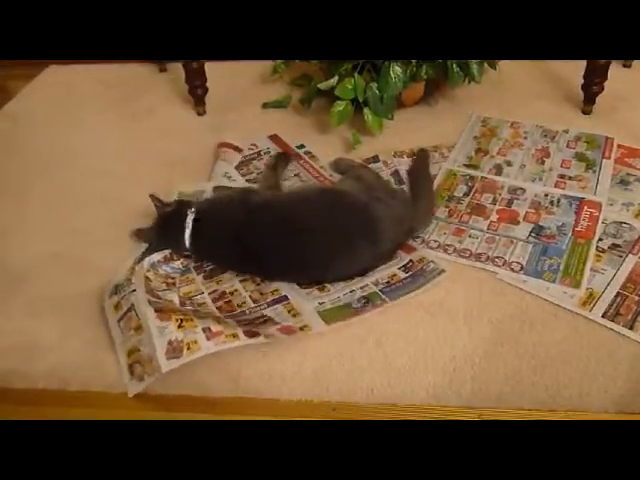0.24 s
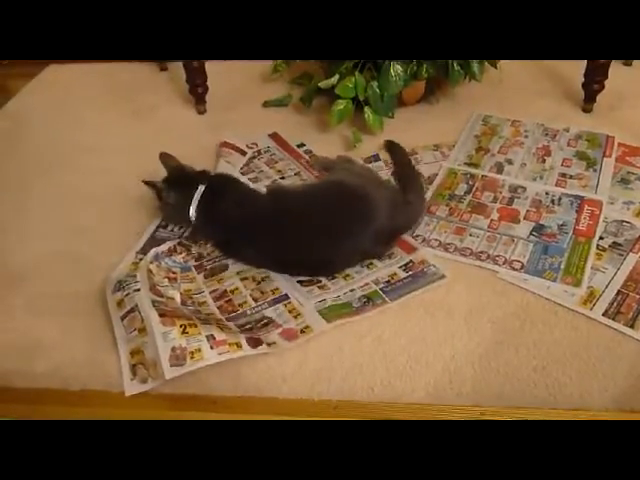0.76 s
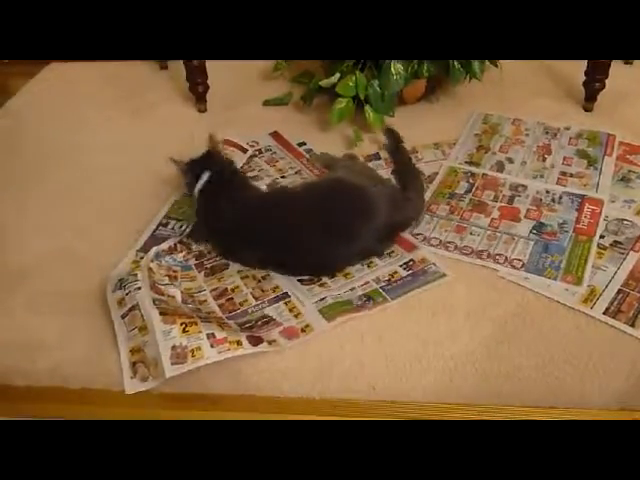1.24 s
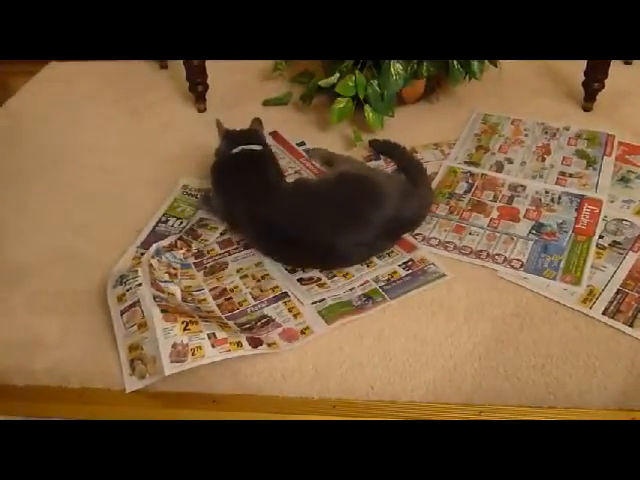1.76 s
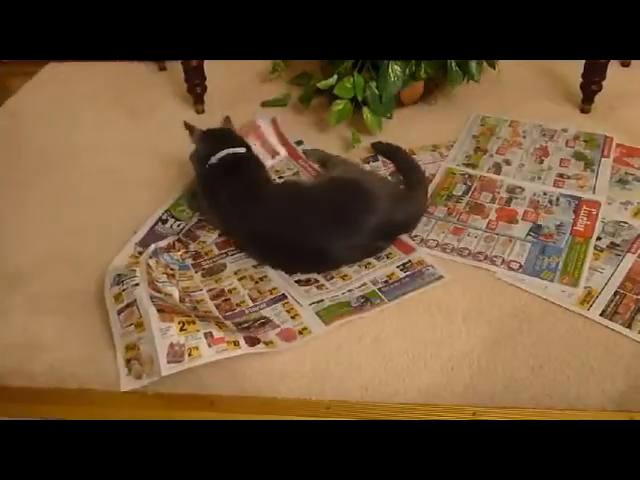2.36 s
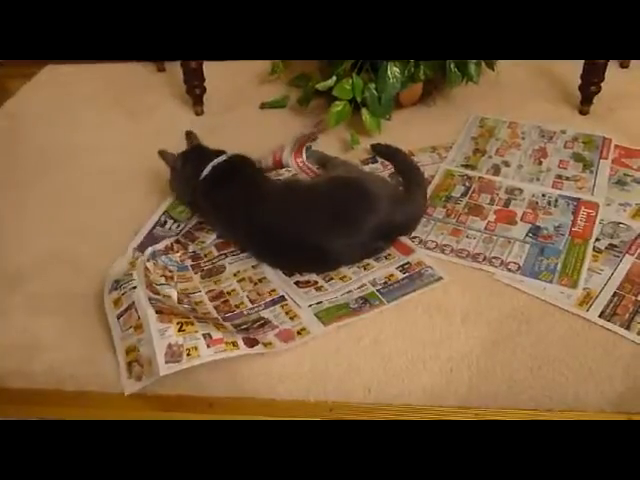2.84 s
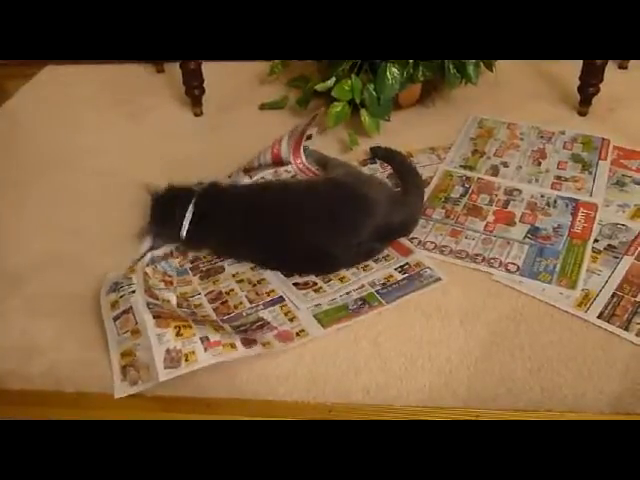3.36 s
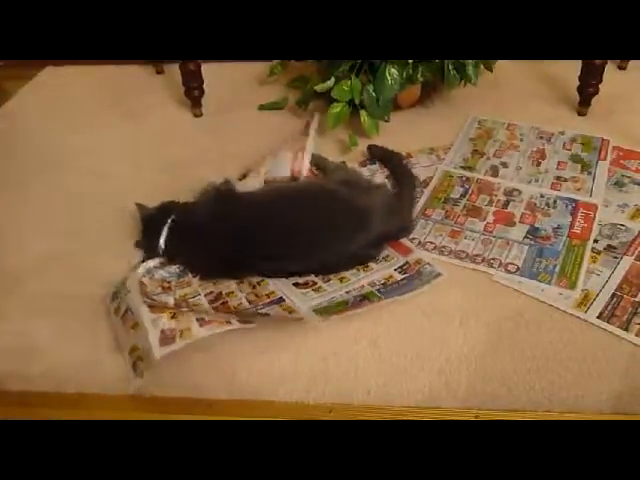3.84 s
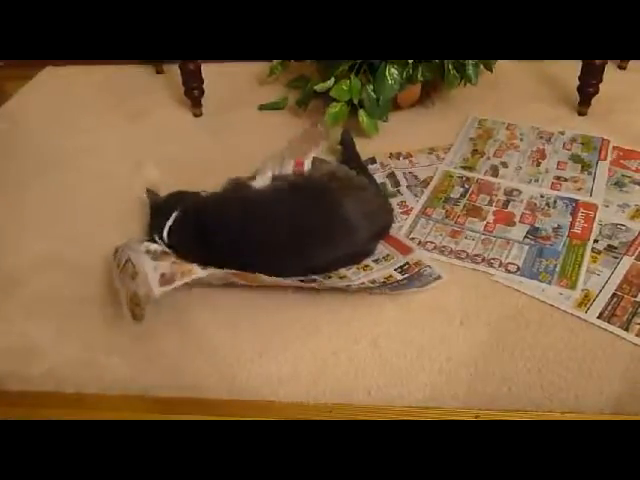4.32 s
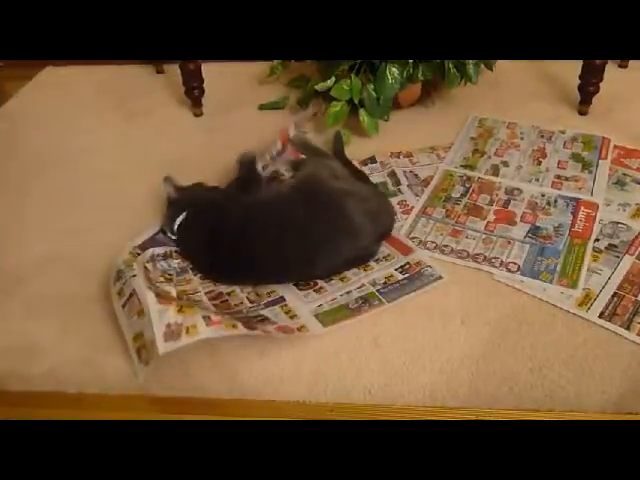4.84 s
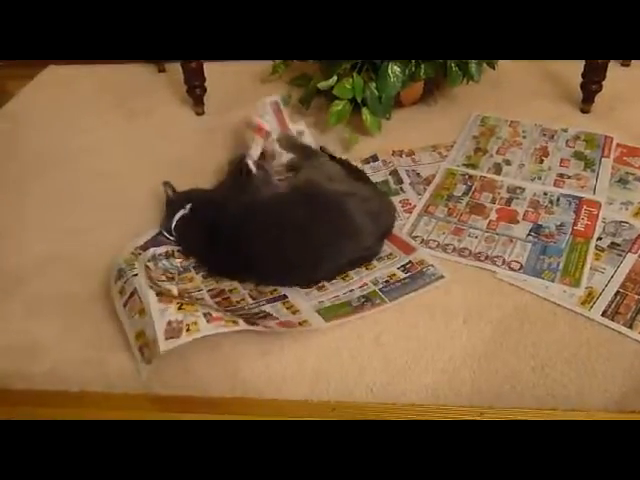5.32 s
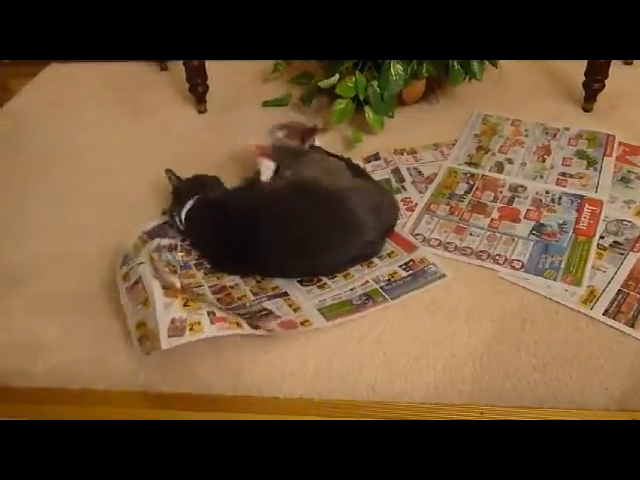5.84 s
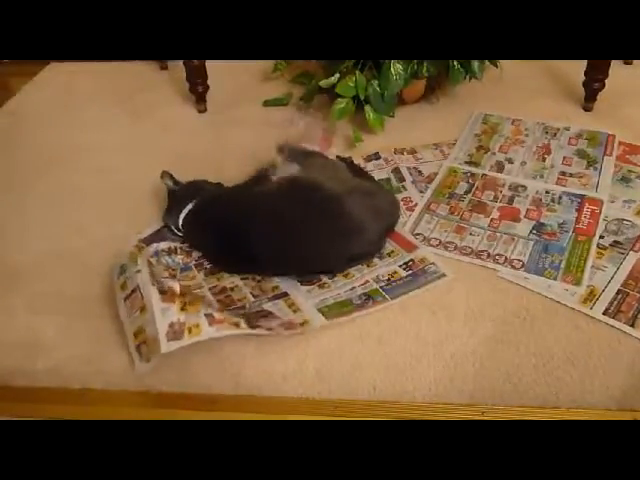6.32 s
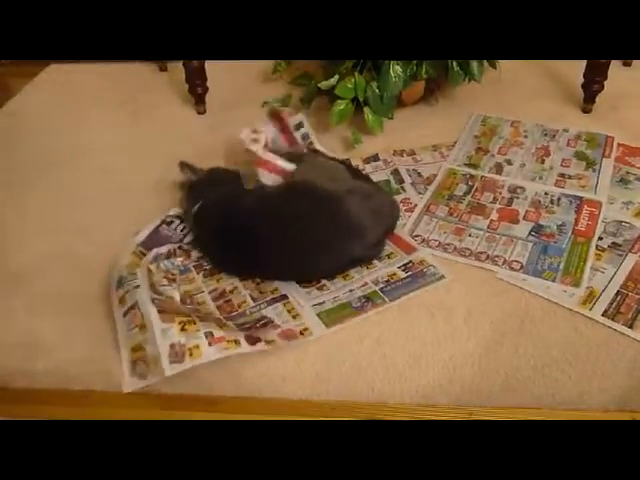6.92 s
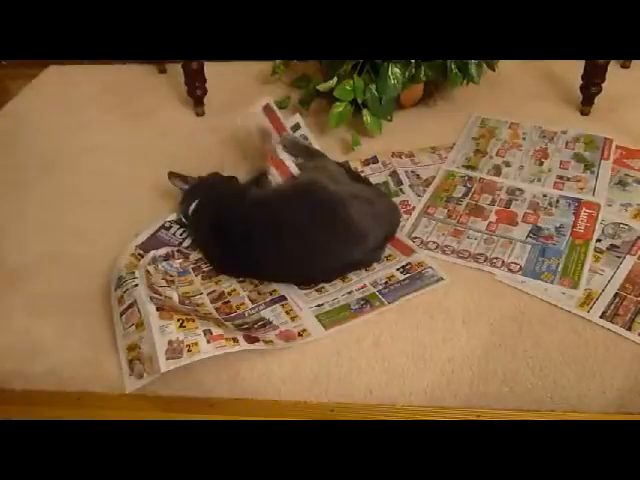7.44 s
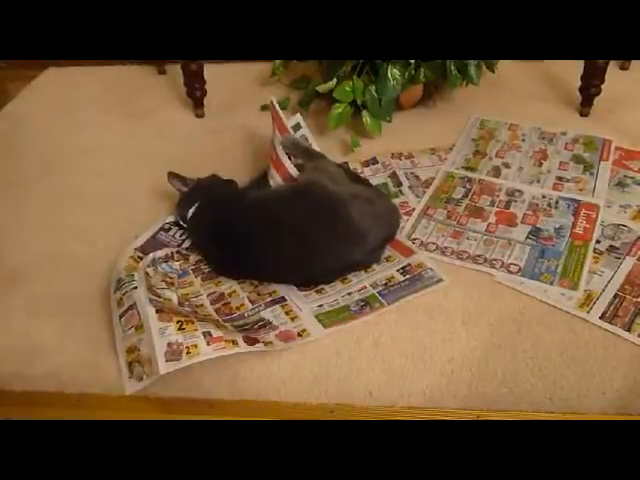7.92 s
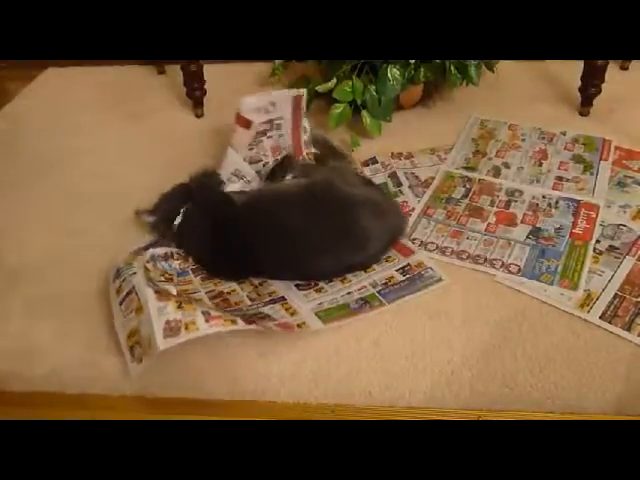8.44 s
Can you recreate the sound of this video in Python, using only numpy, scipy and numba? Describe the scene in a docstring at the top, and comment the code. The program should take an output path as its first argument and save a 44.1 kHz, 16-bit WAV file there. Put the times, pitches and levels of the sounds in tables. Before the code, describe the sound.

Newsprint crackles, snaps and flaps in irregular bursts as a cat squirms on it in a carpeted room, with a faint collar-tag tinkle.

```python
"""Furnished, carpeted room: a cat rolls and kicks on sheets of newsprint before a small camera.
Creases buckle in dense swarms and loud single snaps, and sheets flap: all short decaying sines.
A collar tag tinkles (decaying modes) and something squeaks faintly (wavering sines).
Echoes and a reverberant tail surround these; a soft room tone of filtered noise and a hum lies beneath."""
import sys
import numpy as np
from scipy import signal
from scipy.fft import rfft, irfft
from scipy.io import wavfile
from scipy.ndimage import uniform_filter1d
from numba import njit

SR = 44100
rng = np.random.default_rng(int(sys.argv[2]) if len(sys.argv) > 2 else 0)


def store_pcm(level_fs):
    """Save levels as 16-bit WAV."""
    pcm = np.round(np.clip(level_fs, -1, 1) * 32767).astype(np.int16)
    wavfile.write(sys.argv[1], SR, np.atleast_2d(pcm).T)


def natural_amplitude(level_db):
    """Convert a level in decibels to a linear amplitude factor, elementwise."""
    exponent = np.asarray(level_db, float) / 20
    return 10 ** exponent


N = 382788
TIME_S = np.arange(N) / SR

# Room tone spectral density: (frequency [Hz], relative density [dB])
ROOM_TONE_DENSITY = [(25, 17.5), (60, -1), (170, 4), (300, -6), (420, -7), (600, -11.5), (900, -10),
                     (1500, -12), (3000, -20), (6000, -28.5), (8500, -33.5)]
# Kicks, rolls and shuffles of the cat: (start [s], length [s], crinkle drive [dB],
# flap of whole sheets re crinkle [dB], fine crackle re crinkle [dB])
MOVES = [(0.04, 0.068, -52, -9, -25), (0.177, 0.13, -49, -4, -19), (0.316, 0.21, -51.5, -4.5, -7.5),
         (1.439, 0.014, -51, 4.5, -11), (1.566, 0.018, -43.5, -4.5, -5), (1.894, 0.049, -42.5, -1.5, -17),
         (2.11, 0.02, -42, -11, -10), (2.283, 0.036, -44, -9, -5), (2.375, 0.23, -45.5, -4.5, -7),
         (2.792, 0.015, -54.5, 8, -12), (2.9, 0.062, -57, 3, -14), (3.212, 0.1, -55, 4, -5),
         (3.406, 0.069, -41, -5.5, -3.5), (3.55, 0.057, -49.5, -5, -14), (3.658, 0.07, -50.5, -6, -19),
         (3.776, 0.067, -40.5, -8, -6.5), (3.889, 0.055, -37, -15, -8), (3.987, 0.12, -41.5, -5, -7.5),
         (4.195, 0.071, -45, 1, -8), (4.317, 0.18, -40.5, -4, -8.5), (4.597, 0.11, -45.5, -4.5, -6),
         (4.782, 0.063, -47, -5.5, -4.5), (4.898, 0.048, -35.5, -4, -6), (5.043, 0.046, -45, -13, -4),
         (5.15, 0.031, -40, -2, -1), (5.317, 0.058, -34, -4, -3), (5.421, 0.064, -37, -6, -6),
         (5.624, 0.1, -44, -7.5, -3.5), (5.795, 0.12, -42.5, -5.5, -3), (5.963, 0.062, -32.5, -4, -3),
         (6.075, 0.17, -40.5, -5, -9.5), (6.363, 0.043, -35.5, 1, -7.5), (6.478, 0.11, -33, -5, -4.5),
         (6.658, 0.057, -41.5, -0.5, -2), (6.702, 0.037, -49.5, -4, -3), (6.812, 0.13, -37.5, -6.5, -4.5),
         (6.996, 0.08, -47.5, -1.5, -10), (7.113, 0.082, -41, -4.5, -10.5),
         (7.227, 0.075, -40.5, -2, -12.5), (7.374, 0.1, -54, -3, -12), (7.51, 0.071, -52, 2.5, -8),
         (8.203, 0.1, -51, -0.5, -10), (8.36, 0.05, -53, 4, -14), (8.417, 0.12, -48, -6, -21),
         (8.56, 0.079, -56.5, -3, -5)]
# Drive from the cat's weight between moves: crinkle [dB], flap [dB], fine crackle [dB]
REST_DRIVE_DB = [-70, -63, -81]
# Ring level of paper patches by pitch: (frequency [Hz], relative level [dB])
PAPER_SPECTRUM = [(59, -43), (100, -30.5), (288, 0.5), (380, -8), (511, -4), (663, -3.5), (2020, 8.5),
                  (5690, -3.5), (8400, -51.5), (10900, -62), (18500, -120)]
# Loudest single creases giving way: (time [s], relative level [dB], patch pitch [Hz],
# crack sharpness [dB], crackle set off re snap [dB])
SNAPS = [(0.1186, -35, 1950, -25, -16.5), (0.2174, -29.5, 2100, -30.5, -16),
         (0.3365, -40, 1540, -9.5, -18.5), (0.4968, -34, 1510, -14, -14.5),
         (0.6988, -32.5, 1940, -21.5, -13.5), (1.3681, -32, 1080, -19, -18),
         (1.4364, -32, 1990, -7.5, -18.5), (1.5588, -35.5, 1440, -8.5, -18), (1.8868, -28, 1490, -30, -20),
         (1.9706, -27, 1510, -10.5, -17), (2.097, -33.5, 1960, -29, -16), (2.362, -28, 1890, -24, -20.5),
         (2.4358, -24.5, 1210, -14.5, -16.5), (2.4945, -35, 3800, -1, -18),
         (2.5643, -29.5, 930, -4.5, -18.5), (3.2415, -38, 2070, -11, -18), (3.372, -25.5, 1580, -13, -17.5),
         (3.468, -33, 1660, -4, -22.5), (3.5543, -36, 1940, -24, -20.5), (3.697, -30.5, 1560, -15, -19),
         (3.7515, -16, 2030, -7.5, -20.5), (3.8442, -22.5, 1180, -5.5, -21),
         (3.9158, -20.5, 1110, -19, -20), (4.068, -30, 1540, -8.5, -14.5), (4.1909, -29, 1010, -15, -22),
         (4.25, -29.5, 1990, -11, -17), (4.3818, -33, 2180, -6.5, -18), (4.406, -24.5, 2010, -20.5, -22),
         (4.6209, -29, 920, -20, -13.5), (4.7706, -36.5, 2870, -2, -21), (4.8289, -22.5, 3380, -13, -19),
         (4.8913, -31, 2050, -6.5, -18.5), (5.0487, -30.5, 1730, -1.5, -20),
         (5.1496, -21.5, 1070, -14.5, -19), (5.286, -34.5, 1480, -15, -19),
         (5.3204, -27.5, 1530, -9.5, -18), (5.369, -18.5, 1580, -6.5, -20), (5.456, -27, 2040, -14, -17.5),
         (5.6272, -29, 2340, -13, -19), (5.7389, -21.5, 3420, -13, -21), (5.8053, -29, 2070, -13, -23),
         (5.9565, -31, 1110, -15, -19.5), (5.9859, -12.5, 2660, -15, -19), (6.0676, -21, 2010, -17, -22.5),
         (6.0879, -25.5, 1090, -10, -19), (6.1544, -26.5, 2020, -17.5, -18), (6.332, -34.5, 2660, -11, -15),
         (6.359, -20, 1500, -19, -30), (6.3802, -22, 2160, -14, -20), (6.469, -27.5, 2060, -16, -24),
         (6.492, -22, 1470, -7, -26.5), (6.5333, -19, 1066, -11.5, -21.5), (6.6472, -20, 1970, -8, -16.5),
         (6.8015, -28.5, 1950, -2, -21), (6.9127, -21.5, 1150, -21.5, -24.5),
         (7.1023, -28.5, 1880, -14.5, -19.5), (7.2157, -22.5, 1600, -13.5, -24),
         (7.273, -27, 1660, -4, -20.5), (7.5032, -24.5, 1090, -14.5, -23.5),
         (7.5972, -36, 1100, -13.5, -20.5), (8.2666, -30, 2020, -21, -18), (8.3534, -30, 969, -12.5, -14.5),
         (8.422, -35, 1110, -12, -19), (8.4442, -25, 3380, -16.5, -19.5), (8.4795, -22, 1130, -18, -19.5)]
# Collar tag strikes: (time [s], level [dB])
TAG_HITS = [(0.641, -41.5), (8.572, -39), (8.6567, -52.5)]
# Collar tag modes: (frequency [Hz], level re strike [dB], T60 [s])
TAG_MODES = [(6050, -18, .16), (6015, -20, .12), (5930, -14, .04), (6950, -19, .03)]
# Faint squeaks: (start [s], length [s], pitch [Hz], mean level [dB])
SQUEAKS = [(.81, .085, 3450, -70), (7.978, .028, 2430, -60.5)]
# Floor, furniture, wall: (nominal delay [s], level re direct [dB])
ECHOES = [(.004, -7.5), (.0095, -12.5), (0.0142, -15.5)]
# Reverberation time: (frequency [Hz], T60 [s])
ROOM_T60 = [(200, 0.68), (1000, 0.62), (6000, 0.29)]
# Resonances of floor, room and camera body: (centre [Hz], width [Hz], lift [dB])
RESONANCES = [(228, 22, 2), (325, 120, 5), (583, 180, 6), (1010, 270, 3), (1530, 250, 3), (2050, 200, 2.5),
              (3640, 850, 3.5), (5810, 880, 3.5)]


def on_log(table, hz):
    """Read a (Hz, value) table, linear in log frequency."""
    table_hz, value = np.transpose(table)
    return np.interp(np.log(np.maximum(hz, 1)), np.log(table_hz), value)


def level(x, rms_db):
    """Scale to an rms level."""
    return x * natural_amplitude(rms_db) / np.sqrt(np.mean(x ** 2))


def walk(per_s):
    """Smooth random curve, per_s fresh values a second, spread near 1."""
    hold = SR // per_s
    steps = np.repeat(rng.standard_normal(N // hold + 1), hold)
    smooth = uniform_filter1d(uniform_filter1d(steps, hold), hold)
    return 1.3 * smooth[:N]


def band(x, lo_hz, hi_hz):
    """Band-pass."""
    return signal.sosfilt(signal.butter(2, [lo_hz, hi_hz], "bandpass", fs=SR, output="sos"), x)


@njit
def rings(start_s, hz, t60_s, size, n, sr):
    """Sum of exponentially dying sines, each cut at its T60."""
    out = np.zeros(n)
    for k in range(len(start_s)):
        phasor = size[k] + 0j
        turn = np.exp(2j * np.pi * hz[k] / sr - np.log(1000) / (t60_s[k] * sr))
        first = int(start_s[k] * sr)
        for j in range(first, min(n, first + int(t60_s[k] * sr))):
            out[j] += phasor.imag
            phasor *= turn
    return out


def room_tone():
    """Air and appliance murmur: half-octave noise bands that flicker a little, plus one faint hum."""
    murmur = 0
    for hz in 25 * 2 ** np.arange(0, 8.5, .5):
        noise = band(rng.standard_normal(N), hz / 2 ** .25, hz * 2 ** .25)
        murmur = murmur + natural_amplitude(on_log(ROOM_TONE_DENSITY, hz) + 1.1 * walk(per_s=6)) * noise
    hum = np.sin(2 * np.pi * 480 * TIME_S)
    return level(murmur, rms_db=-50.5) + level(hum, rms_db=-69)


def moves():
    """Drive of crinkle, flap and fine crackle: each move rises, holds, falls fast, then settles slowly."""
    attack_db_per_s, release_db_per_s = 448, 158
    settle_db, settle_db_per_s = -24.5, 49  # paper goes on unfolding
    coarse_s = TIME_S[::64]
    power = natural_amplitude(2 * np.array(REST_DRIVE_DB))[:, None] + 0 * coarse_s
    for start_s, length_s, crinkle_db, flap_db, crisp_db in MOVES:
        early_s = np.maximum(start_s - coarse_s, 0)
        late_s = np.maximum(coarse_s - start_s - length_s, 0)
        rise = natural_amplitude(-2 * attack_db_per_s * early_s)  # factor 2: dB of power
        fall = natural_amplitude(-2 * release_db_per_s * late_s)
        settle = natural_amplitude(2 * (settle_db - settle_db_per_s * late_s))
        peak = natural_amplitude(2 * (crinkle_db + np.array([0, flap_db, crisp_db])))
        power = power + np.outer(peak, (fall + settle) * rise)
    return [np.interp(TIME_S, coarse_s, np.sqrt(p)) for p in power]


def swarm(per_s, lo_hz, hi_hz, cycles, spread_db):
    """Paper patches of many sizes buckle up or down at random; most are faint, a few stand out."""
    where, patch, luck, side = rng.random((per_s * N // SR, 4)).T
    hz = lo_hz * (hi_hz / lo_hz) ** patch
    stand_out = np.minimum(-np.log(1 - luck), 4.5)
    size = np.sign(side - .5) * hz * natural_amplitude(on_log(PAPER_SPECTRUM, hz) + spread_db * stand_out)
    return level(rings(where * N / SR, hz, cycles / hz, size, N, SR), rms_db=0)


def crinkle():
    """Three sizes of patch follow the cat's motion in quick avalanches; sparse ticks follow it too."""
    mid_move, flap_move, crisp_move = moves()
    _, snap_db, _, sharp_db, after_db = np.transpose(SNAPS)
    avalanche = np.clip(walk(per_s=40), -2, 2)

    flap_drive = flap_move * natural_amplitude(-5.0 + 0.89 * avalanche)
    mid_drive = mid_move * natural_amplitude(-5.0 + 1.46 * avalanche)
    mid_drive = mid_drive + aftermath(snap_db + after_db)
    crisp_drive = crisp_move * natural_amplitude(-5.5 + 0.85 * avalanche + 1.7 * walk(per_s=60))
    crisp_drive = crisp_drive + aftermath(snap_db + after_db + sharp_db + 13)

    ticks = natural_amplitude(-14.5) * mid_move * swarm(per_s=90, lo_hz=2460, hi_hz=6950, cycles=3.0, spread_db=3.0)
    flap = flap_drive * swarm(per_s=1500, lo_hz=114, hi_hz=796, cycles=5.0, spread_db=2.5)
    mid = mid_drive * swarm(per_s=2500, lo_hz=860, hi_hz=3810, cycles=5.25, spread_db=3.0)
    crisp = crisp_drive * swarm(per_s=1800, lo_hz=3570, hi_hz=8600, cycles=4.5, spread_db=1.0)
    return flap + mid + crisp + ticks


def aftermath(db):
    """Each snap loosens its neighbours: activity starts at once and dies away."""
    t60_s = 0.097
    kicks = np.zeros(N)
    np.add.at(kicks, (np.transpose(SNAPS)[0] * SR).astype(int), natural_amplitude(db))
    return signal.lfilter([1], [1, -1000 ** (-1 / (t60_s * SR))], kicks)


def snaps():
    """Each snap rings its patch; seven short cracks, low to high in pitch, scatter over 2.2 ms."""
    start_s, db, hz, sharp_db, _ = np.transpose(SNAPS)
    out = rings(start_s + 0.000965, hz, 45.0 / hz, natural_amplitude(db - 13.5), N, SR)
    for pitch in np.linspace(0, 1, 7):
        late, detune, side = rng.random((len(start_s), 3)).T
        crack_hz = 1100 * 6.8 ** pitch * (0.72 + 0.62 * detune)
        # sharpness acts on the higher cracks
        crack_db = db - 17.5 + (sharp_db + 14) * np.clip(2 * pitch - .5, 0, 1)
        size = np.sign(side - .5) * natural_amplitude(crack_db)
        out += rings(start_s + .0022 * late, crack_hz, 16.0 / crack_hz, size, N, SR)
    return out


def tag():
    """Small metal collar tag: each strike rings every mode."""
    start_s, db = np.transpose(TAG_HITS)
    out = 0
    for hz, mode_db, t60_s in TAG_MODES:
        out = out + rings(start_s, hz + 0 * start_s, t60_s + 0 * start_s, natural_amplitude(db + mode_db), N, SR)
    return out


def squeaks():
    """Soft, slightly rough tones of wavering pitch that swell and fade."""
    out = 0
    for start_s, length_s, hz, db in SQUEAKS:
        swell = np.sin(np.pi * np.clip((TIME_S - start_s) / length_s, 0, 1))
        waver_s = np.cumsum(.006 * walk(per_s=30)) / SR
        tone = np.sin(2 * np.pi * hz * (TIME_S + waver_s))
        out = out + natural_amplitude(db + 2 * walk(per_s=150)) * swell * tone
    return out


def room(x):
    """Direct sound, three near echoes, and a tail that fills in, then dies sooner in the treble.
    Every call is another spot on the floor, with its own echo pattern."""
    t_s = TIME_S[:SR // 2]
    tail = 0
    for hz in 125 * 2 ** np.arange(7):
        noise = band(rng.standard_normal(len(t_s)), hz / 2 ** .5, hz * 2 ** .5)
        tail = tail + noise * 1000 ** (-t_s / on_log(ROOM_T60, hz))
    tail = tail * np.clip(t_s / 0.017, 0, 1)
    response = natural_amplitude(-7) * tail / np.sqrt(np.sum(tail ** 2))  # tail energy re direct
    response[0] += 1
    for delay_s, db in ECHOES:
        response[int(delay_s * rng.uniform(.9, 1.1) * SR)] += natural_amplitude(db)
    return signal.fftconvolve(x, response)[:N]


def scene():
    """The near sounds shift quickly among eight spots, each with its own echoes, over the room tone."""
    near = crinkle() + snaps() + tag() + squeaks()
    weights = natural_amplitude(14 * np.array([walk(per_s=14) for _ in range(8)]))
    shares = weights / np.sum(weights, axis=0)
    mix = sum(room(near * share) for share in shares) + room_tone()
    return mix[None]


def roll_off(x):
    """The treble ends steeply here."""
    return signal.sosfilt(signal.butter(12, 8550, fs=SR, output="sos"), x)


def record(dry):
    """Resonances near the microphone lift bands, bass and top are cut, the converter adds an offset."""
    hz = np.fft.rfftfreq(N, 1 / SR)
    lift_db = sum(db / (1 + (2 * (hz - f_hz) / width_hz) ** 2) for f_hz, width_hz, db in RESONANCES)
    coloured = irfft(rfft(dry) * natural_amplitude(lift_db - 0.5), N)
    thin = signal.sosfilt(signal.butter(2, 110, "highpass", fs=SR, output="sos"), coloured)
    dull = signal.sosfilt(signal.butter(4, 7400, fs=SR, output="sos"), thin)
    # steep top cut: 1 dB ripple, 70 dB stopband
    cut = signal.sosfilt(signal.ellip(8, 1, 70, 8294, fs=SR, output="sos"), dull)
    offset = .0146  # of full scale
    return roll_off(cut + offset)


dry = scene()
out = record(dry)
store_pcm(out)
```